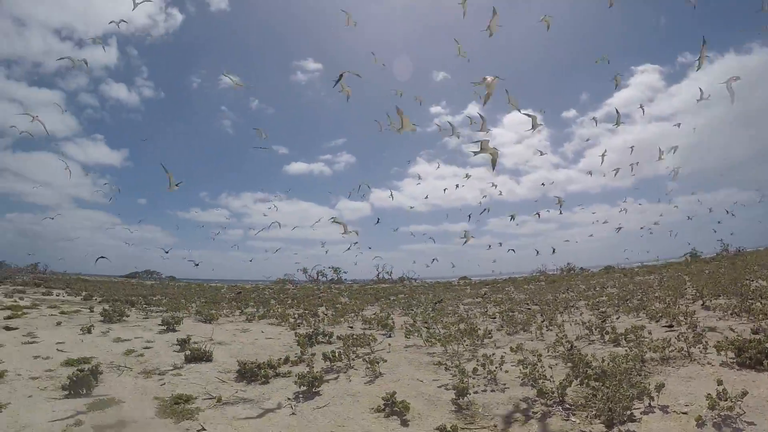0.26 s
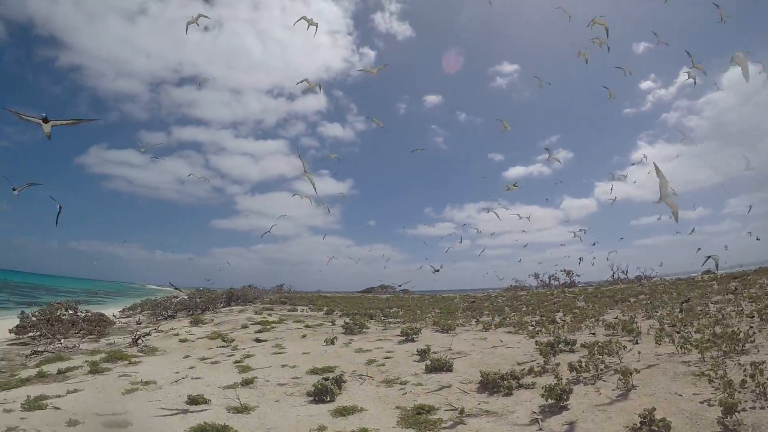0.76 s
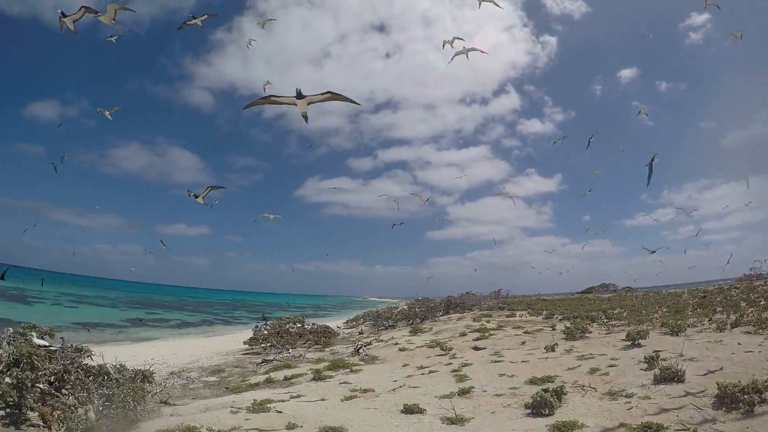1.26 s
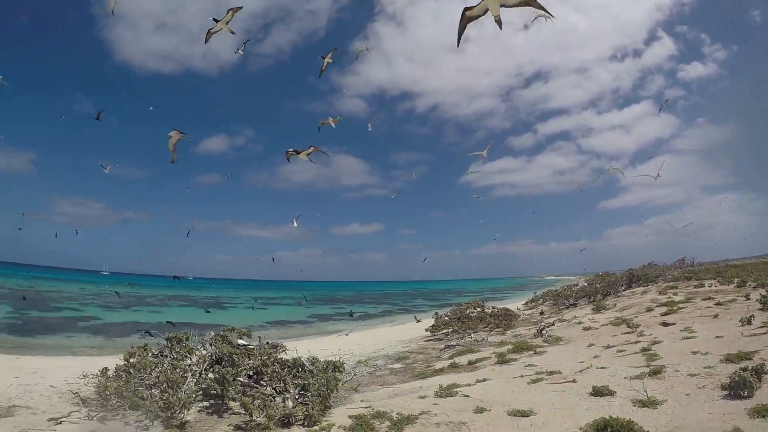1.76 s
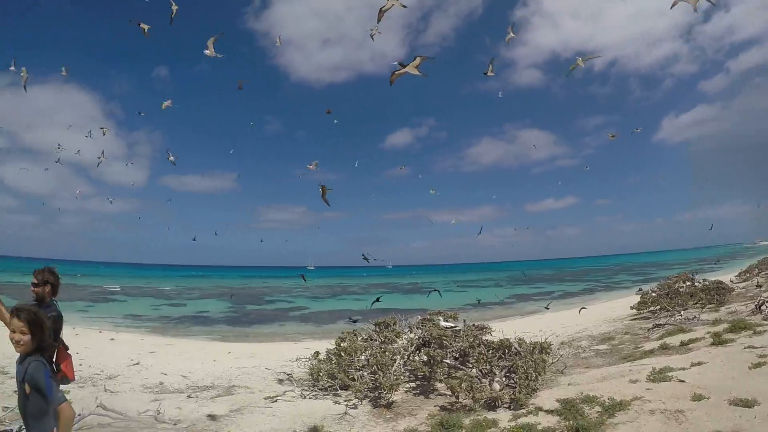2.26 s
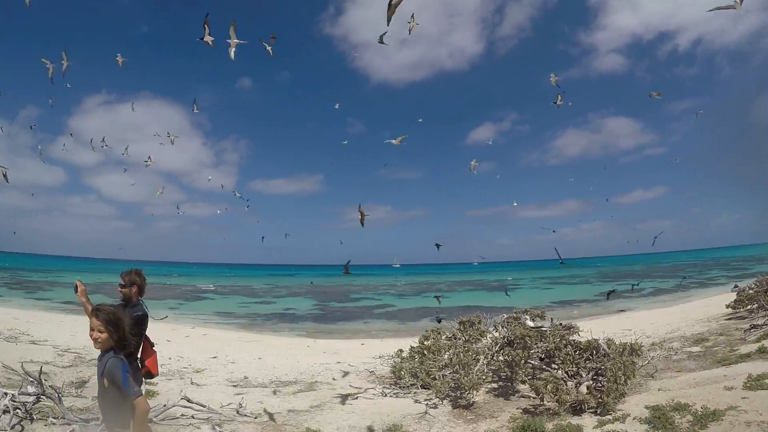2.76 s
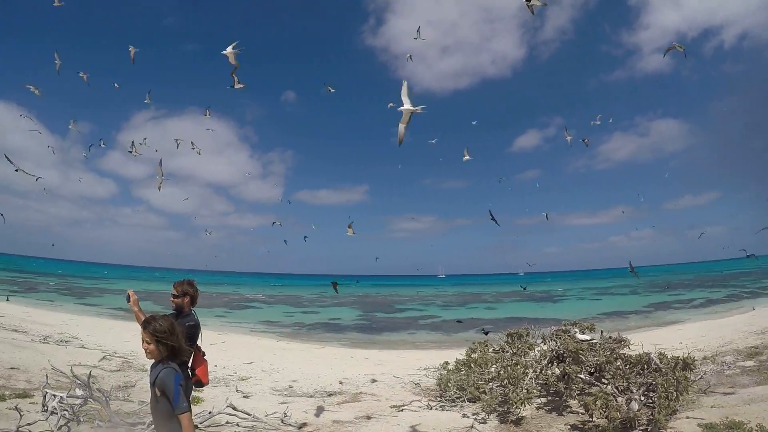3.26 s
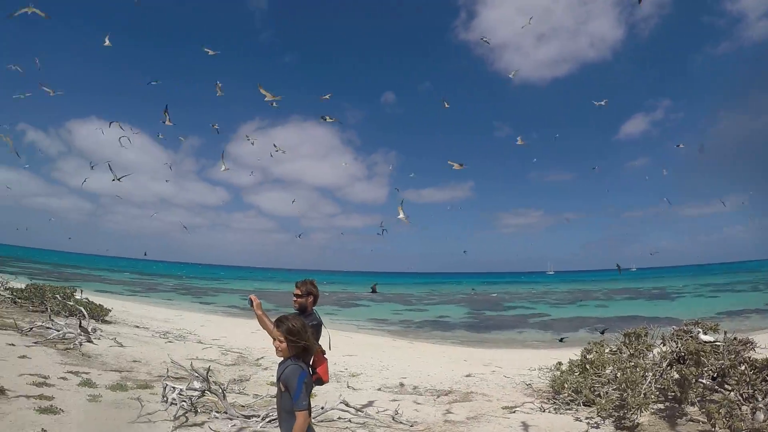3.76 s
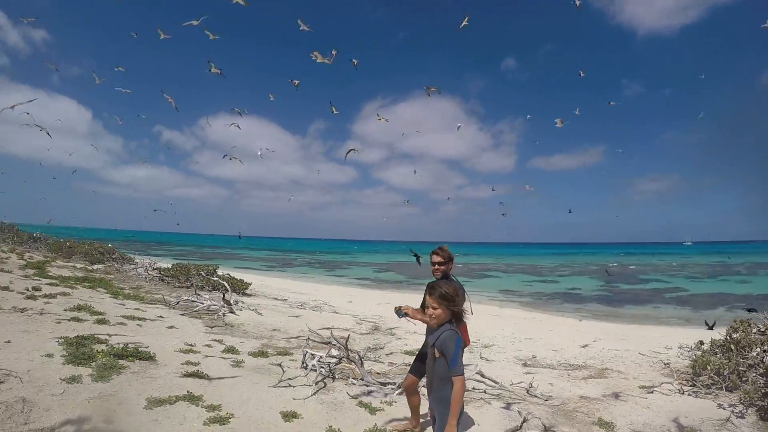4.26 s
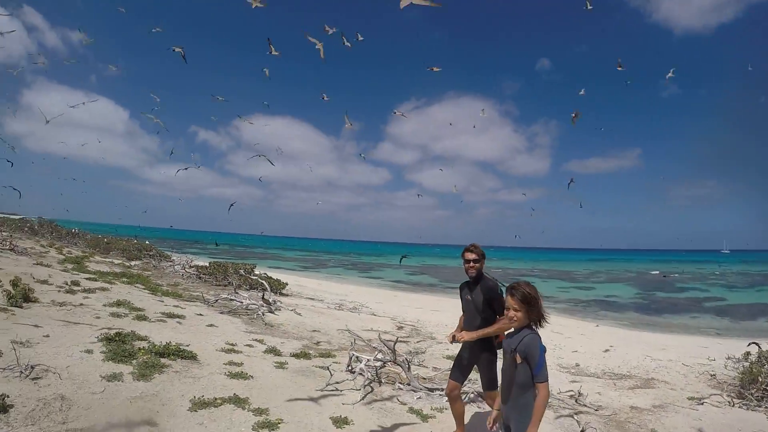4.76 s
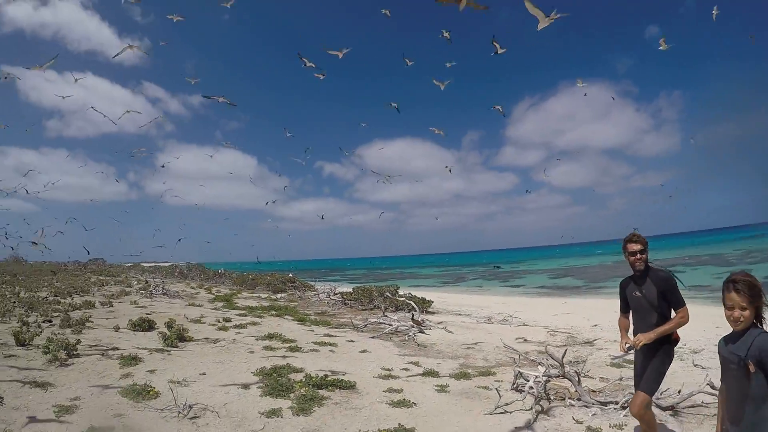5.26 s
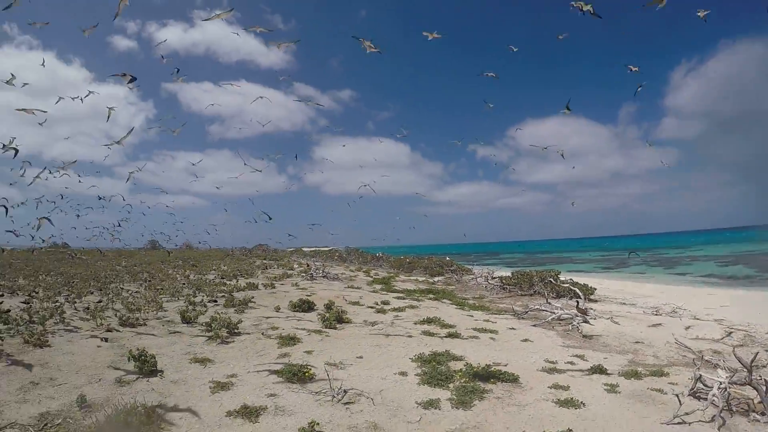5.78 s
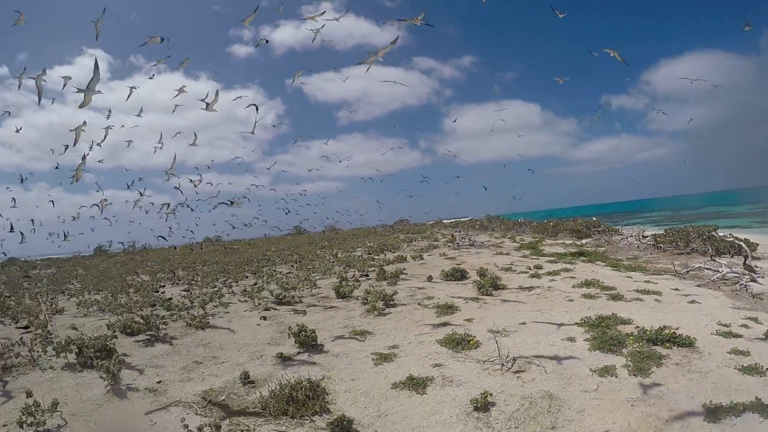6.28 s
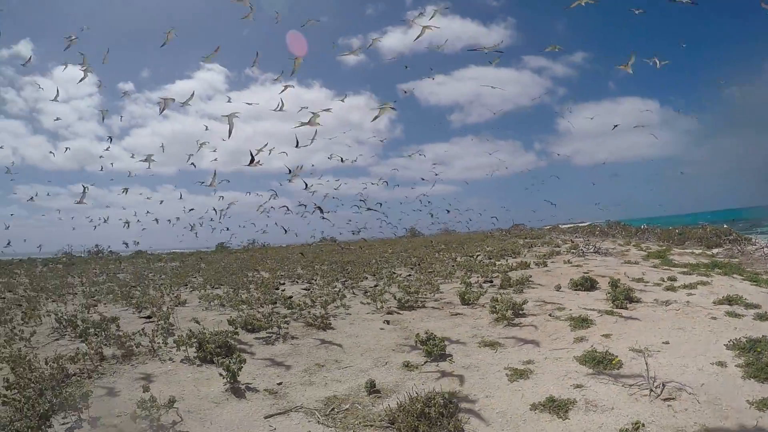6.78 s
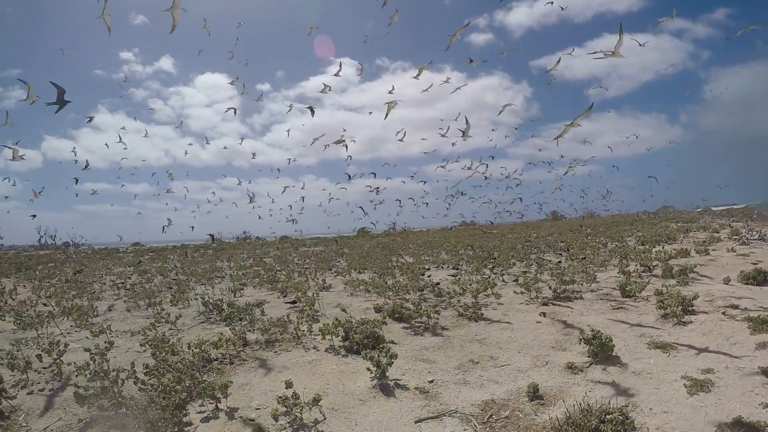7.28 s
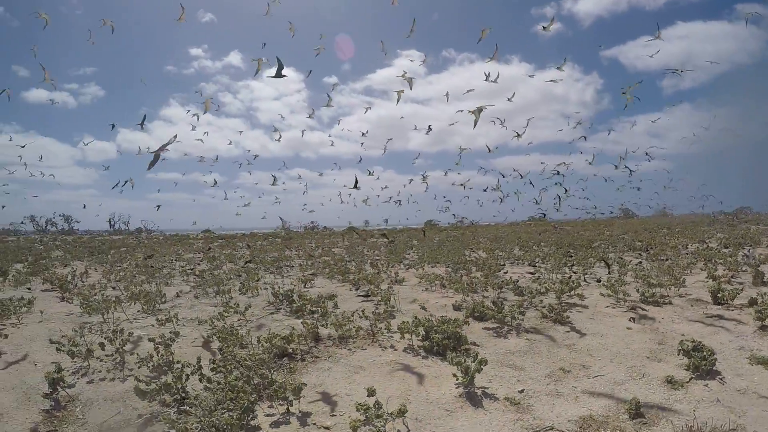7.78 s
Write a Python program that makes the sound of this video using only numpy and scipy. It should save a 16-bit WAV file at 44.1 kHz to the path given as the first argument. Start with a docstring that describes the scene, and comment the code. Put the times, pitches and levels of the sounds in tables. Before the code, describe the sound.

Hundreds of terns over a sandy shore merge into a continuous, shimmering shrill wall. Nearer birds overhead give short nasal warbling cries, harsh squawks, dry little rattles and brief clucks, busiest in the middle. Wind thumps and rumbles low on the exposed handheld microphone, strongest in the first two and a half seconds, with airy hiss. Open outdoors, no room echo.

```python
"""Near terns give nasal, warbling cries from overhead: harmonics on a gliding pitch, shaped by a throat.
Noisy snaps ringing resonances make harsh squawks and rattles; brief harmonic tones make short clucks.
Behind them hundreds of birds merge into a shrill wall, built from many overlapping cries and noise.
Gusts rumble and hiss on the microphone as coloured noise, over the faint air of a beach."""
import sys
import numpy as np
from scipy import signal
from scipy.fft import rfft, irfft
from scipy.io import wavfile
from scipy.ndimage import uniform_filter1d, map_coordinates

SR = 44100
rng = np.random.default_rng(int(sys.argv[2]) if len(sys.argv) > 2 else 0)


def store_pcm(level_fs):
    """Save levels as 16-bit WAV."""
    pcm = np.round(np.clip(level_fs, -1, 1) * 32767).astype(np.int16)
    wavfile.write(sys.argv[1], SR, np.atleast_2d(pcm).T)


N = 354078
TIME = np.arange(N) / SR

# kinds of cry, pitch gliding with a warble about the glide: (start [s], length [s], start pitch [Hz],
# end pitch [Hz], warble depth [octaves], time to its crest [s], warble period [s], relative level [dB],
# brightness of the upper harmonics [dB], roughness [0-1], main throat resonance [Hz])
CRY_TUNES = [(0.058,.125,806,684.4,.15,.028,.1,-34,-8,.25,2700),
             (0.209,.155,806.3,697.4,.1,.076,.097,-35.5,-7.5,0.3,2730),
             (.55,.1,695,973,0.1726,.088,.105,-41.5,1,0.45,2900),
             (0.668,.037,765,700,.07,.059,.068,-47.5,4.5,0.38,3420),
             (0.911,.145,789.7,844.6,.25,.159,.167,-46.5,-2.5,.04,2880),
             (1.123,.06,839,858,0.027,.035,.1,-52,-17,0,3260),
             (1.238,.075,863,809,.04,.035,0.108,-51,-14,0,3200),
             (1.88,.14,632.2,717.8,0.0503,.111,.138,-39.5,-10.5,.3,2630),
             (2.809,.063,745,1068,0.0753,.033,.078,-35,-5.5,0.35,2760),
             (2.904,.088,985,926,.08,.061,.072,-35.5,-5,0,2680),
             (2.992,.032,829,804,0.0092,0,0.076,-46,-7,0.1,3900),
             (3.125,.04,1051,955,.03,.01,.086,-51,-10,0.1,3930),
             (3.31,.073,670,672,.054,.058,.07,-38,-7.5,0.56,2710),
             (3.59,.075,640,700,0.0605,.05,.1,-47,-15,0.1,2850),
             (3.625,.145,855.5,902,.18,.034,.102,-31.5,-12,.08,2890),
             (3.797,.162,887,889,0.1205,.083,.094,-32.5,-10.5,.15,2760),
             (3.967,.07,540,769,0.063,0.0039,0.0763,-37,-12,.5,2750),
             (4.16,.09,596,521.7,0.0897,.011,.086,-41,-21,.2,2800),
             (4.42,.1,635,804.4,0.0089,0.069,.115,-37,-6,0.3,2750),
             (4.52,.2,770.6,834.3,0.0602,.12,.123,-36.5,-4.5,.25,2730),
             (4.82,.15,822,880,.04,.012,0.174,-36,-16,0.07,2800),
             (5.199,.064,893,908,0.021,.035,.07,-46,-14,.1,3300),
             (5.25,.075,655,960,0.1117,.07,.072,-42.5,-10,.15,3370),
             (5.405,.08,687,993.4,.09,.072,.073,-55.5,9,0.15,3230),
             (5.707,.065,1019,906,0.032,.033,0.0745,-44,-4,0.3,3550),
             (5.873,.105,934.6,998,0.0403,.085,.1,-43.5,-10,0.25,3660),
             (6.439,.08,742,744.4,0.0806,.077,.084,-38,-4,0.72,3200),
             (6.569,.085,910,1051,.015,.071,0.077,-41.5,-3,.85,2780),
             (6.721,.065,830,1043,0.0096,.018,.115,-44,5,.3,2690),
             (6.805,0.1065,860.3,870.4,0.011,0.1214,.134,-49,-3.5,0.1,4350),
             (7.1,.06,816,1078,0.0587,.019,.072,-44.5,0,0.8,3300),
             (7.43,.07,521,731,0.021,.042,0.102,-48,-12,.2,4100),
             (7.951,.085,978,974,0.021,.069,0.0724,-36.5,-2.5,0.34,3100)]
CRY_FADE_S = .014   # each end of a cry fades over this time


def from_db(db):
    """Amplitude ratio: 20 dB is a factor of ten."""
    return 10 ** (np.asarray(db) / 20)


def rms_one(x):
    """Scale a signal to unit root-mean-square amplitude."""
    return x / np.sqrt(np.mean(x ** 2) + 1e-20)


def in_time(rows):
    """Each column of a (time [s], ...) table as a piecewise linear envelope."""
    s, *columns = np.transpose(rows)
    return [np.interp(TIME, s, c) for c in columns]


def at_hz(points, hz):
    """Gain of a spectrum: decibels interpolated on a log-frequency axis."""
    f, db = np.transpose(points)
    return from_db(np.interp(np.log(hz + 1e-6), np.log(f), db))


def wander(rate, size):
    """Smooth random motion about 0, spread near 1: splines through independent values, rate per second."""
    at = np.arange(size) * rate / SR
    return map_coordinates(rng.standard_normal(int(at[-1]) + 3), [at], order=2, mode="nearest")


def coloured(spectrum):
    """White noise shaped by a spectrum; rms 1."""
    white = rfft(rng.standard_normal(N))
    return rms_one(irfft(white * at_hz(spectrum, np.fft.rfftfreq(N, 1 / SR)), N))


def resonate(x, modes):
    """Steep-sided resonances (centre [Hz], width [Hz], level [dB]) whose powers add; rms 1."""
    hz = np.fft.rfftfreq(len(x), 1 / SR)
    power = 0
    for f, width, db in modes:
        detuning = (hz - f) / (width / 2)
        power = power + from_db(db) ** 2 / (1 + detuning ** 2 / 2) ** 3
    return rms_one(irfft(rfft(x) * np.sqrt(power), len(x)))


def evened(x, seconds):
    """Divide by the running rms, which removes swells slower than the given time."""
    size = int(seconds * SR)
    power = uniform_filter1d(uniform_filter1d(x ** 2, size), size)
    return x / np.sqrt(np.maximum(power, 1e-12))


def add(out, start_s, sound):
    """Superpose a sound at a time, dropping what falls outside."""
    i = int(start_s * SR)
    a, b = max(i, 0), min(i + len(sound), N)
    if b > a:
        out[a:b] += sound[a - i:b - i]


def swell(size, fade_s):
    """Loudness envelope: quarter-sine ends round a level middle."""
    t = np.arange(size) / SR
    return np.sin(np.pi / 2 * np.clip(np.minimum(t, t[-1] - t) / fade_s, 0, 1))


def bell(s, length):
    """Gaussian rise and fall of height 1, as wide as length at 1/e."""
    return np.exp(-(2 * (TIME - s) / length) ** 2)


def surges(rows, rest_db=-120):
    """Gain of a resting level with swells (middle [s], length [s], level [dB]) on top; their powers add."""
    power = sum((from_db(db) * bell(s, length)) ** 2 for s, length, db in rows)
    return np.sqrt(from_db(rest_db) ** 2 + power)


def thinned(x, edge_hz=1730):
    """High-pass radiation: a small bill radiates little below its lowest resonance."""
    return signal.sosfilt(signal.butter(10, edge_hz, "high", fs=SR, output="sos"), x)


def contour(length, start_hz, end_hz, depth, crest_s, period_s):
    """Pitch through one cry: an exponential glide with sinusoidal frequency modulation."""
    t = np.arange(-CRY_FADE_S / 2, length + CRY_FADE_S / 2, 1 / SR)
    glide = start_hz * (end_hz / start_hz) ** (t / length)
    return glide * 2 ** (depth * np.cos(2 * np.pi * (t - crest_s) / period_s))


def near_cries(jitter=0.025, rasp=0.67, half_tone_db=-7, shimmer_db=3.0, throat_octaves=0.19,
               effort=0.79, level_db=0.5):
    """Source and filter: the syrinx buzzes on a swooping pitch and the throat shapes its harmonics.

    In a rough voice uneven cycles smear the harmonics and add lines between them."""
    # what throat and bill pass besides the main resonance: (frequency [Hz], gain [dB])
    side_throat = [(500, -29.5), (1400, -40), (2600, -35), (4150, -17.5), (5050, -9.5), (5600, -6),
                   (6300, -26.5), (7300, -17), (8200, -32.5), (9400, -29), (11000, -44), (14000, -48)]
    out = np.zeros(N)
    multiple = np.arange(2, 31)[:, None] / 2   # harmonics 1 to 15 and the lines between
    for s, *tune, db, bright_db, rough, throat_hz in CRY_TUNES:
        pitch = contour(*tune)
        size = len(pitch)
        phase = 2 * np.pi * np.cumsum(pitch * (1 + rough * jitter * wander(900, size))) / SR
        hz = multiple * pitch
        # the bird turns and beats its wings, so each harmonic shimmers by itself
        shimmer = shimmer_db * np.array([wander(45, size) for _ in multiple])
        main = np.exp(-np.log2(hz / throat_hz) ** 2 / (2 * throat_octaves ** 2))
        upper = np.clip((hz - 3600) / 1200, 0, 1)   # brightness sets in from 3600 to 4800 Hz
        throat = main + at_hz(side_throat, hz) * from_db(upper * bright_db)
        line_gain = np.where(multiple % 1 > 0, rough * from_db(half_tone_db), 1)
        gain = throat * from_db(shimmer) * line_gain
        start_phase = rng.uniform(0, 2 * np.pi, multiple.shape)
        voice = np.sum(gain * np.sin(multiple * phase + start_phase), axis=0)
        # pressing harder raises pitch and loudness together
        loudness = from_db(db + level_db) * (pitch / pitch.mean()) ** effort * swell(size, CRY_FADE_S)
        roughened = voice * (1 + rough * rasp * wander(700, size))
        add(out, s - CRY_FADE_S / 2, np.sqrt(2) * roughened * loudness)
    return out


def snapping(per_s, size, uneven=.4):
    """Irregular impulse excitation: snaps of the syrinx, uneven in spacing and strength; rms 1."""
    cycles = np.cumsum(per_s * np.exp(uneven * wander(300, size))) / SR
    snaps = np.diff(np.floor(cycles), prepend=0)
    return rms_one(snaps * np.exp(uneven * rng.standard_normal(size)))


def squawks(snaps_per_s=420, breath=0.45, width_hz=430, overtone_db=-17, level_db=-3.5):
    """Impulse-driven resonance: the syrinx snaps irregularly and each snap rings the throat."""
    # harsh squawks: (middle [s], length at half height [s], relative level [dB], centre [Hz])
    squawk_rows = [(.63, 0.031, -37, 2770), (3.656, 0.029, -32, 2140), (3.809, 0.019, -23.5, 2730),
                   (3.87, 0.055, -43, 2180), (4.022, 0.037, -31.5, 2130), (4.13, 0.095, -32, 2080),
                   (5.208, .043, -28, 2000), (5.554, 0.051, -25, 2400), (5.587, .041, -25, 1970),
                   (5.656, 0.051, -24.5, 2000), (5.84, 0.043, -28.5, 2030), (5.938, 0.047, -28, 2060),
                   (6.308, .03, -29, 2150)]
    out = np.zeros(N)
    for s, length, db, hz in squawk_rows:
        size = int(2 * length * SR)
        source = snapping(snaps_per_s, size) + breath * rng.standard_normal(size)
        voice = resonate(source, [(hz, width_hz, 0), (3600, 1800, overtone_db), (6300, 1800, -32)])
        add(out, s - length, from_db(db + level_db) * voice * np.hanning(size))
    return out


def rattles(snaps_per_s=330, breath=0.99, fade_s=.003):
    """Impulse-driven resonance: separate snaps ring the upper resonances of a wide-open bill."""
    # bright rattles: (start [s], length [s], level [dB])
    rattle_rows = [(1.037, 0.024, -45.5), (2.978, 0.032, -45), (3.804, 0.017, -42), (4.716, 0.049, -40.5),
                   (6.812, 0.016, -40.5)]
    # open-bill resonances: (centre [Hz], width [Hz], level [dB])
    open_bill = [(3870, 910, 0.5), (5400, 780, -0.5), (6850, 900, -9), (8800, 1900, -19.5)]
    out = np.zeros(N)
    for s, length, db in rattle_rows:
        size = int(length * SR)
        source = snapping(snaps_per_s, size) + breath * rng.standard_normal(size)
        add(out, s, from_db(db) * resonate(source, open_bill) * swell(size, fade_s))
    return out


def clucks(sag_octaves_per_s=3.9):
    """Additive harmonics: a few clean cycles of the syrinx start at once, hold, and die as the pitch sags."""
    # short clear clucks: (start [s], level [dB], starting pitch [Hz])
    cluck_rows = [(1.616, -28, 862), (1.740, -29, 825), (1.779, -29.5, 820), (5.988, -28.5, 843),
                  (6.084, -29, 823), (7.492, -29.5, 847)]
    # partials of a cluck: (multiple of the pitch, level [dB])
    cluck_partials = [(2, -30), (3, 0), (4, -24), (6, -21.5), (8, -27)]
    attack_s, hold_s, release_s = 0.0013, 0.0039, 0.0035
    out, t = np.zeros(N), np.arange(int(.05 * SR)) / SR
    shape = np.minimum(t / attack_s, 1) * np.exp(-np.maximum(t - attack_s - hold_s, 0) / release_s)
    for s, db, hz in cluck_rows:
        phase = 2 * np.pi * np.cumsum(hz * 2 ** (-sag_octaves_per_s * t)) / SR
        voice = sum(from_db(db + part_db) * np.sin(round(k) * phase) for k, part_db in cluck_partials)
        add(out, s, np.sqrt(2) * shape * voice)
    return out


def crowd(count, distance_db, pitch_scale=.92, pitch_spread=.18, jitter=.008, throb_db=3.0):
    """Superposition: many birds give the same kinds of cry at their own moment, pitch, pace and distance."""
    out = np.zeros(N)
    # 40 timbres of 14 harmonics, each one cycle of a wave
    strengths = from_db(rng.normal(0, 4, (40, 15)))
    partials = strengths * np.exp(2j * np.pi * rng.random((40, 15))) * (np.arange(15) > 0)
    buzzes = irfft(partials, 2048)
    tunes = [contour(*tune) for s, *tune, db, bright_db, rough, throat_hz in CRY_TUNES]
    unsteady, throb = 1 + jitter * wander(900, N), from_db(throb_db * wander(130, N))
    for k, (when, kind, pace, voice, distance, mood) in enumerate(rng.random((count, 6))):
        tune, buzz = tunes[int(kind * len(tunes))], buzzes[k % len(buzzes)]
        steps = np.arange(0, len(tune), .9 + .8 * pace).astype(int)
        pitch = tune[steps.clip(0, len(tune) - 1)]
        first = int(mood * N / 2)
        own = slice(first, first + len(pitch))   # this bird's stretch of unsteadiness
        hz = pitch * pitch_scale * np.exp(pitch_spread * (2 * voice - 1)) * unsteady[own]
        place = (np.cumsum(hz) / SR * len(buzz)).astype(int) % len(buzz)
        sound = buzz[place] * throb[own] * swell(len(hz), 0.009)
        start_s = (k + when) / count * (N / SR + .2) - .2
        add(out, start_s, sound * from_db(distance_db * (2 * distance - 1)))
    return rms_one(out)


def flock(far_db=-2.5, shrill_db=1.0, hoarse_db=1.9, upper_db=0.0, hoarse_wash_db=2.5,
          upper_wash_db=-11.5, low_db=-69):
    """Merging sources: middle-distance birds stand out of a far crowd, whose furthest voices blur to a wash."""
    # swell and ebb of the flock: (time [s], relative shrill level [dB], relative upper level [dB])
    flock_levels = [(0, -35, -45.5), (.3, -33.5, -43.5), (.85, -36, -52), (1.32, -31.5, -44.5),
                    (1.7, -39, -52), (2.1, -33.5, -48.5), (2.6, -38.5, -52), (2.9, -34.5, -48.5),
                    (3.3, -36, -46.5), (3.88, -30, -47.5), (4.3, -33.5, -48), (5, -33, -49),
                    (5.5, -32, -44), (6.05, -35.5, -48.5), (6.62, -32.5, -41.5), (6.9, -34.5, -46),
                    (8.03, -34, -44.5)]
    # bouts of low, hoarse voices: (middle [s], length [s], relative level [dB])
    hoarse_bouts = [(.05, 0.14, -40.5), (.47, 0.51, -39.5), (2.6, 0.51, -46.5), (3.25, 0.64, -41),
                    (3.89, 0.11, -37), (4.13, 0.35, -39.5), (4.56, 0.27, -41.5), (5.1, 0.62, -45),
                    (5.6, 0.33, -34.5), (5.88, .22, -38), (6.5, 0.7, -45.5), (7.85, 1, -43)]
    # narrow resonances shaping the flock in three registers: (centre [Hz], width [Hz], relative level [dB])
    hoarse_modes = [(1903, 167, -6), (2015, 300, -5)]
    shrill_modes = [(2498.6, 184, 3), (2729, 274, -3), (3297, 314, -16.5)]
    upper_modes = [(4070, 1740, 6), (5040, 1140, 2.5), (5630, 630, -6.5), (6840, 610, -1),
                   (7400, 1500, -14.5), (9150, 1400, -23)]
    middle = crowd(count=250, distance_db=5.5)
    voices = middle + from_db(far_db) * crowd(count=800, distance_db=2.0)
    wash = rng.standard_normal(N)
    shrill_level, upper_level = in_time(flock_levels)
    hoarse_gain = surges(hoarse_bouts, rest_db=-47)
    shrill = evened(resonate(voices + from_db(-9) * wash, shrill_modes), 0.066)
    hoarse = resonate(voices + from_db(hoarse_wash_db) * wash, hoarse_modes)
    hoarse = evened(thinned(hoarse), 0.16)
    upper = evened(resonate(voices + from_db(upper_wash_db) * wash, upper_modes), 0.082)
    # the voices' weak lowest harmonics
    lowest = from_db(low_db) * resonate(middle, [(1566, 170, 0)])
    return (from_db(shrill_level + shrill_db) * shrill + hoarse_gain * from_db(hoarse_db) * hoarse
            + from_db(upper_level + upper_db) * upper + lowest)


def wind(rumble_db=0.87, rush_db=3.5, flutter_db=1.24, buffet=0.16, unrest_db=1.5, unrest_per_s=9):
    """Turbulence: eddies buffet the microphone, and the rush of air past its housing flares with each push."""
    # the breeze: (time [s], relative rumble [dB], relative rush [dB])
    breeze = [(0, -32, -46.5), (.3, -34, -57), (1, -30.5, -51), (2.5, -32.5, -50.5), (3, -34, -55.5),
              (3.3, -30.5, -48.5), (3.7, -35.5, -55), (4.45, -33, -48), (4.9, -35.5, -52), (5.25, -34, -49),
              (5.6, -34.5, -49), (6.6, -36.5, -55.5), (7.4, -35, -54.5), (8.03, -31.5, -49.5)]
    # gusts on top of it: (peak [s], length [s], relative rumble [dB], relative rush [dB])
    gusts = [(0.444, 0.26, -24, -53), (0.626, 0.12, -30.5, -60), (1, 0.07, -27, -52),
             (1.283, 0.18, -34, -43), (1.332, 0.12, -20.5, -49.5), (1.75, 0.038, -32, -55),
             (2.138, 0.17, -20, -52), (2.3, 0.23, -19, -43.5), (4.07, 0.29, -30, -49.5),
             (5.867, 0.19, -35, -55), (6.328, 0.11, -34, -48), (7.631, 0.061, -23.5, -47)]
    # stretches where the microphone's wind noise drops abruptly: (start [s], end [s], drop of the rush [dB])
    quiet_spans = [(1.44, 1.67, 18), (1.682, 2.082, 11.5), (3.493, 3.845, 4), (6.79, 7.57, 2)]
    # spectra of the eddies and of the rush: (frequency [Hz], relative density [dB per Hz])
    rumble_colour = [(12, -10.5), (22, -3.5), (32, 1), (55, -7), (90, -11), (120, -14), (160, -27.5),
                     (250, -36.5), (500, -45), (5000, -105)]
    rush_colour = [(80, 0), (170, 7), (280, 3), (450, -1), (750, -1), (1300, -7), (2500, -6), (6000, -25),
                   (14000, -45.5)]
    quiet_edge_s, quiet_rumble = 0.051, 0.29   # onset time; share of the drop that the rumble takes
    rumble_rest, rush_rest = in_time(breeze)
    drop = sum(db * ((TIME >= start) & (TIME < end)) * 1.0 for start, end, db in quiet_spans)
    quiet = uniform_filter1d(drop, int(quiet_edge_s * SR))
    unrest = unrest_db * wander(unrest_per_s, N)
    rumble_gusts = [(s, length, db) for s, length, db, _ in gusts]
    rush_gusts = [(s, length, db) for s, length, _, db in gusts]
    rumble = surges(rumble_gusts, rumble_rest + unrest - quiet_rumble * quiet)
    rush = surges(rush_gusts, rush_rest + unrest - quiet)
    eddies = evened(coloured(rumble_colour), 0.16)
    push = rms_one(1 + buffet * eddies ** 2)
    flutter = from_db(rush_db + flutter_db * wander(70, N))
    hiss = rush * flutter * push * coloured(rush_colour)
    return rumble * from_db(rumble_db) * eddies + hiss


def air(floor_db=-64, sizzle_db=-1.0, grain_db=2.0):
    """Stationary noise of the open shore, with passing amplitude-modulated noise as a thin, grainy hiss."""
    # spectrum of the steady noise: (frequency [Hz], relative level [dB])
    air_spectrum = [(100, -9), (400, -11), (1200, -4), (4000, -15.5), (9000, -16.5), (15000, -20.5)]
    # puffs of high hiss: (middle [s], length [s], relative level [dB])
    hiss_puffs = [(6.56, 0.23, -63), (6.73, .07, -66), (7.1, .07, -83), (7.33, 0.083, -74),
                  (7.49, 0.13, -69)]
    grains = rng.standard_normal(N) * from_db(grain_db * wander(90, N))
    sizzle = from_db(sizzle_db) * surges(hiss_puffs) * resonate(grains, [(11700, 2400, 0)])
    return from_db(floor_db) * coloured(air_spectrum) + sizzle


def scene(ground_db=-12, ground_delay_s=0.0055):
    """Superposition with a reflection: the sand throws back a weak, delayed copy of the birds overhead."""
    near = near_cries() + thinned(squawks()) + clucks() + rattles()
    echo = from_db(ground_db) * np.interp(TIME - ground_delay_s, TIME, near)
    return (near + echo + flock() + wind() + air())[None]


def record(dry, cutoff_hz=15200):
    """Low-pass filtering: an elliptic filter cuts the top steeply."""
    return signal.sosfilt(signal.ellip(10, .2, 80, cutoff_hz, fs=SR, output="sos"), dry)


dry = scene()
out = record(dry)
store_pcm(out)
```